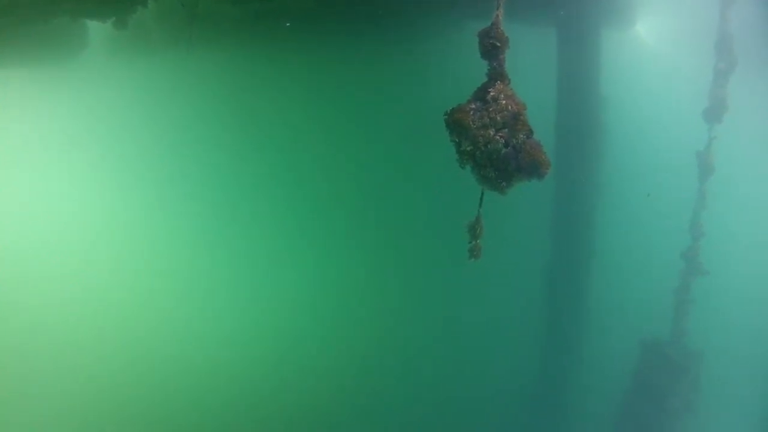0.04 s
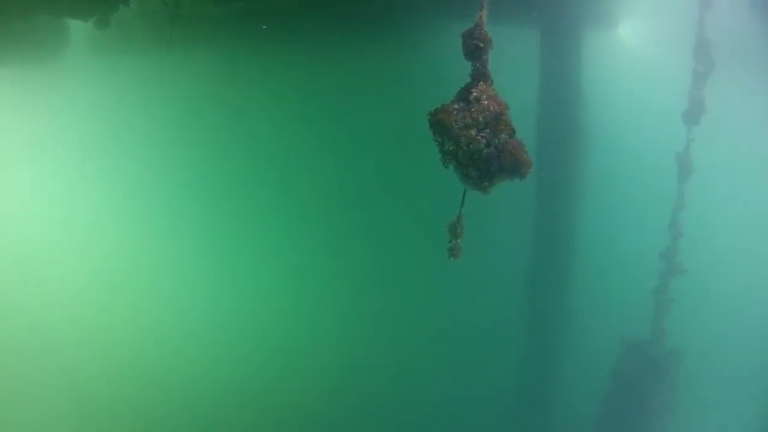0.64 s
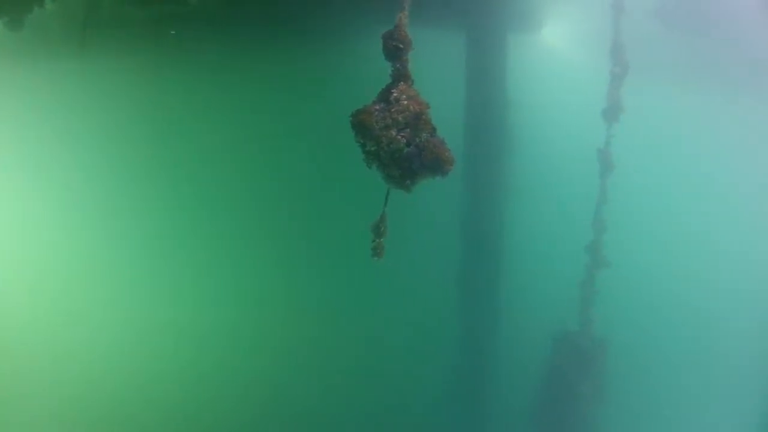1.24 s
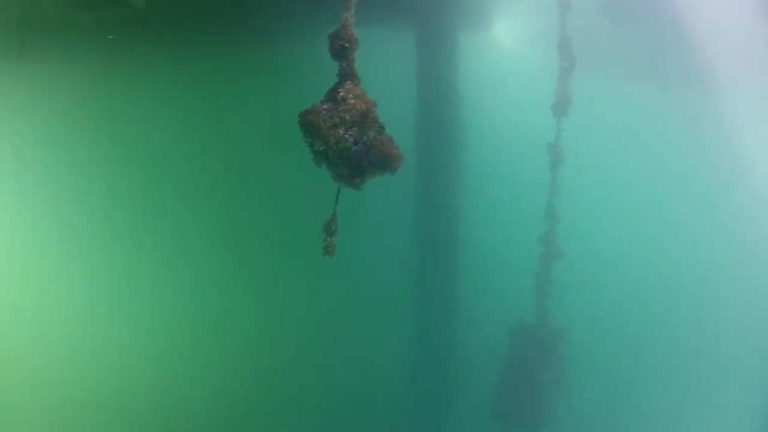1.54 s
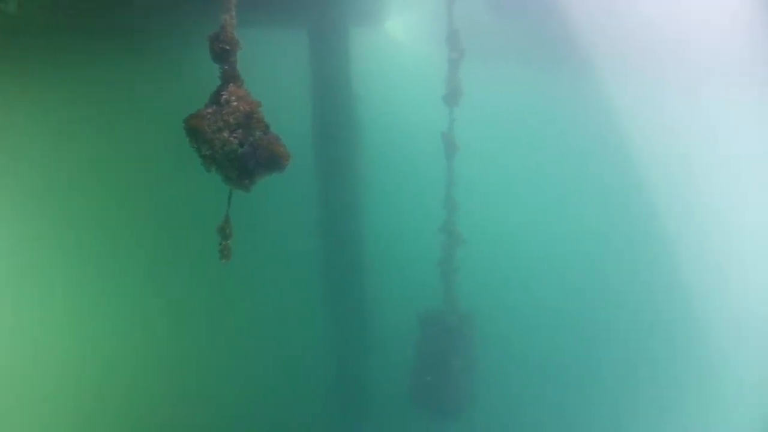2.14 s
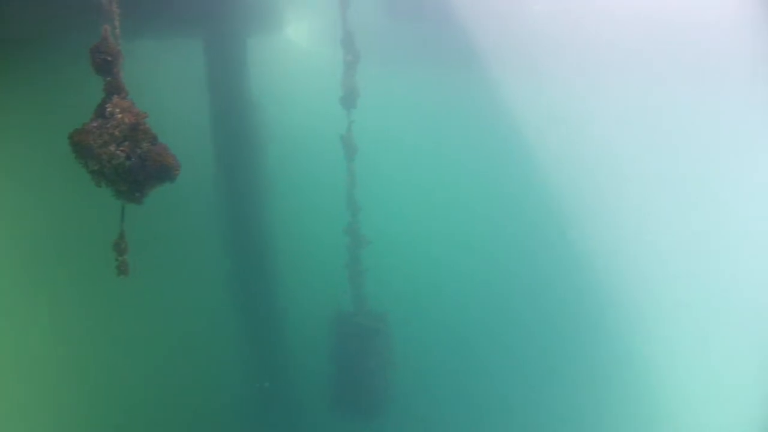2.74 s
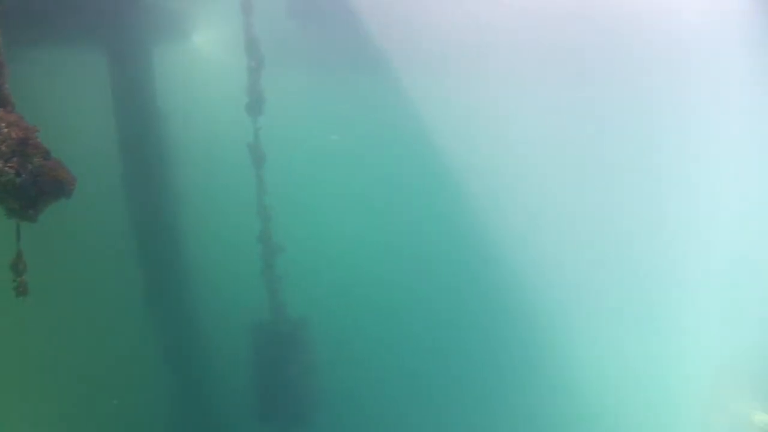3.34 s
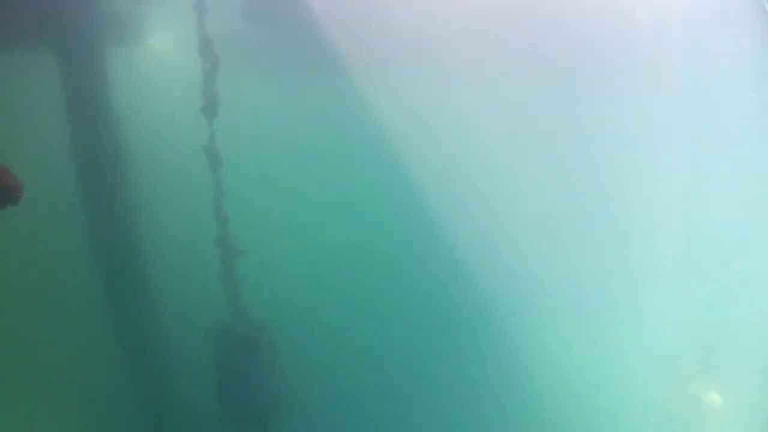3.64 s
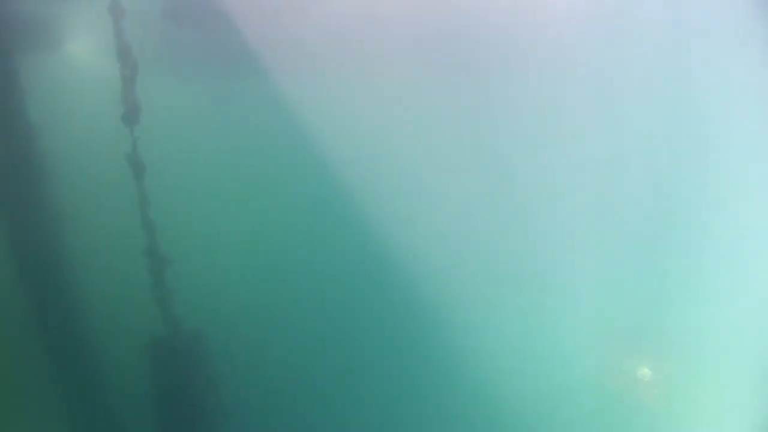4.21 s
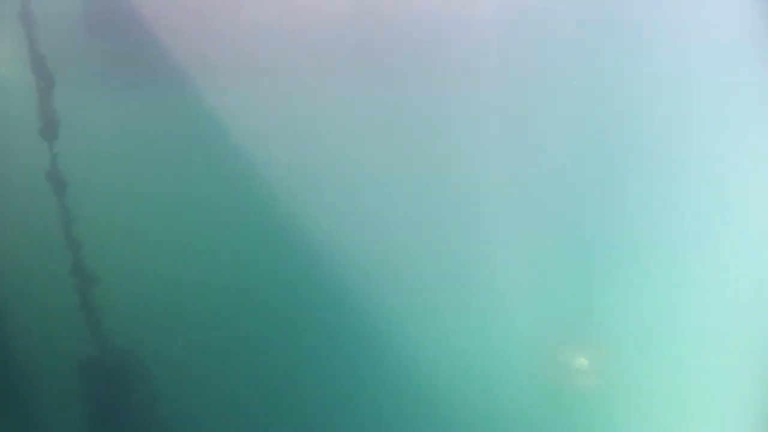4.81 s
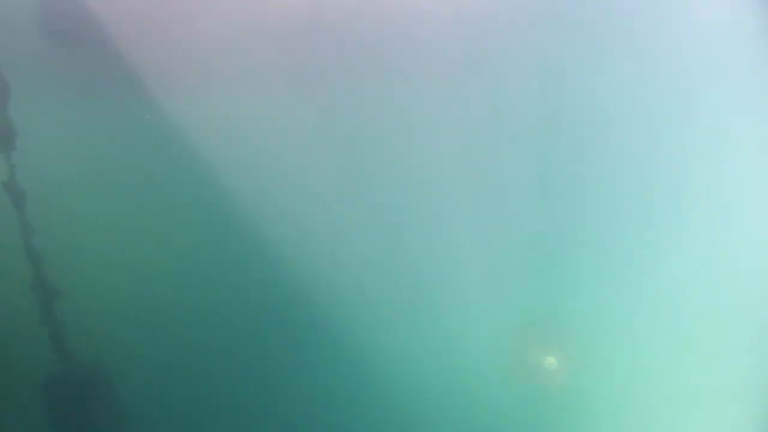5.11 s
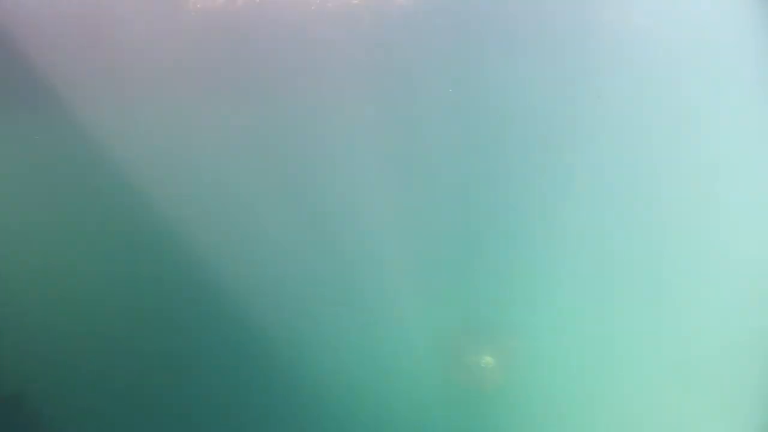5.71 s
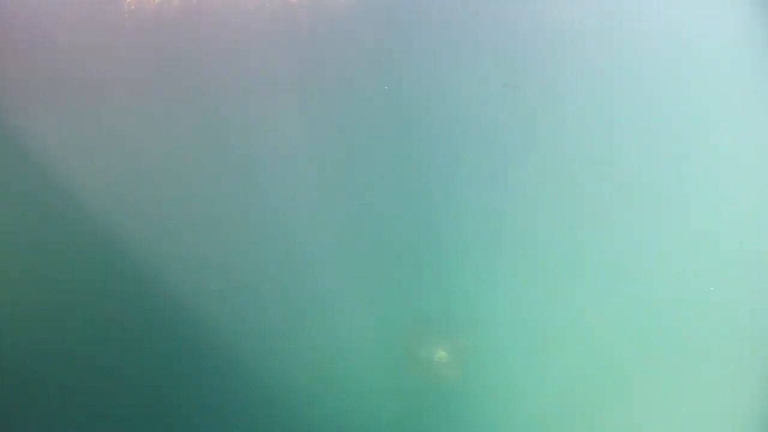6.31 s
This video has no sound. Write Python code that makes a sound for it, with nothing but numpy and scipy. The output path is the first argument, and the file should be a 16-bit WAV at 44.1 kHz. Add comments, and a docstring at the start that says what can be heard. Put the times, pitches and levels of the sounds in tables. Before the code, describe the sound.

Under a dock, a small diving robot's electric thrusters start with a clunk and settle into a low, wavering hum and churn with a thin whine. Snapping shrimp crackle all around, a few sharp, close snaps ringing the housing, over a faint wash of water. Near the end the motors brake with another clunk and the hum sinks away. The microphone is inside the robot.

```python
"""A small diving robot's thrusters start with a clunk, hum and churn under a dock, then brake and stop.
The shafts shake the robot's frame. Snapping shrimp crackle on the pilings all around and ring its
housing, over a low wash of water and two faint fizzes. The robot's microphone is sampled slowly and
each sample is held, which mirrors the hum into a thin whine."""
import sys
import numpy as np
from scipy import signal
from scipy.fft import rfft, irfft
from scipy.io import wavfile

SR = 44100
rng = np.random.default_rng(int(sys.argv[2]) if len(sys.argv) > 2 else 0)


def store_pcm(level_fs):
    """Save levels as 16-bit WAV."""
    pcm = np.round(np.clip(level_fs, -1, 1) * 32767).astype(np.int16)
    wavfile.write(sys.argv[1], SR, np.atleast_2d(pcm).T)


N = 289296
TIME = np.arange(N) / SR
FREQ = np.fft.rfftfreq(N, 1 / SR)

# Modes of frame and housing. Each row: frequency in Hz, width in Hz, relative level in dB.
FRAME_MODES = [(39.3, 60, -11.5), (81, 11, -14), (115.6, 32, 1), (123.3, 11.8, 5), (141.8, 20, -1.5),
               (183.7, 21, -11), (207.2, 36.4, -6), (260.3, 27, -8.5), (269.6, 47, -12), (314, 31, -26),
               (484.5, 67, -16), (549, 28, -18), (584.7, 30, -15.5), (651, 34, -19), (735, 57, -22)]
# Waves of shrimp activity. Each row: time in seconds, level in dB before trim.
COLONY_ACTIVITY = [(0.0, -69), (1.22, -68.5), (1.39, -65), (1.73, -71), (2.15, -67), (2.28, -69),
                   (3.31, -69.5), (3.54, -64.5), (3.73, -66.5), (3.98, -67), (4.97, -70.5), (5.81, -66.5),
                   (6.36, -72.5), (6.56, -65.5)]


def amp(db):
    return 10 ** (np.asarray(db) / 20)


def unit(x):
    """Scales to rms 1."""
    return x / np.sqrt(np.mean(x ** 2) + 1e-20)


def curve(rows):
    """Joins (seconds, value) rows by straight lines."""
    return np.interp(TIME, *np.transpose(rows))


def shape(points, f):
    """Gain of a (Hz, dB) spectrum, falling steeply past its ends."""
    hz, db = np.transpose(points)
    gain = amp(np.interp(np.log(f + 1), np.log(hz), db))
    return gain / (1 + (f / hz[-1]) ** 20) / (1 + (hz[0] / (f + 1) / 2) ** 4)


def colour(x, gain):
    """Filters x by a gain per frequency."""
    return irfft(rfft(x) * gain, N)


def drift(rate_hz):
    """Slow noise, rms 1."""
    return unit(colour(rng.standard_normal(N), np.exp(-(FREQ / rate_hz) ** 2)))


def click(points, size=1024):
    """Minimum-phase click with a (Hz, dB) spectrum, peak 1."""
    log_gain = np.log(shape(points, abs(np.fft.fftfreq(size, 1 / SR))) + 1e-4)
    wave = np.fft.ifft(np.exp(np.conj(signal.hilbert(log_gain)))).real
    return wave / abs(wave).max()


def add(mix, start_s, sound):
    part = mix[max(round(start_s * SR), 0):][:len(sound)]
    part += sound[:len(part)]


def water(level_db=-59.5):
    """Low wash of still harbour water."""
    # Each row: frequency in Hz, relative level in dB.
    spectrum = [(30, 3), (95, -1), (170, -3.5), (280, -8.5), (380, -10.5), (600, -9), (950, -20.5),
                (2300, -24.5), (3800, -25)]
    return amp(level_db) * unit(colour(rng.standard_normal(N), shape(spectrum, FREQ)))


def far_shrimp(groups=5, group_snaps_per_s=70, spread_db=5.5, detune=0.081, trim_db=-0.86):
    """Groups of faint snaps of uneven size, each group at its own pitch."""
    # A far snap through the housing. Each row: frequency in Hz, relative level in dB.
    spectrum = [(700, -11), (1000, -19.5), (1200, 1), (1600, -15.5), (1900, 5.5), (2300, 2.5), (2800, -6.5),
                (3400, -7), (3900, -26)]
    out = np.zeros(N)
    for scale in np.linspace(1 - detune, 1 + detune, groups):
        sizes = amp(spread_db * np.minimum(rng.exponential(1, N), 3))
        fires = rng.random(N) < group_snaps_per_s / SR
        impulses = sizes * fires * rng.choice([-1, 1], N)
        out += signal.oaconvolve(impulses, click([(hz * scale, db) for hz, db in spectrum]))[:N]
    return amp(curve(COLONY_ACTIVITY) + trim_db) * unit(out)


def harbour_echoes(x, near_db=-6, near_t60_s=0.021, far_db=-4, far_t60_s=0.25):
    """Snaps scatter off robot and pilings, then linger between surface and bottom."""
    t = np.arange(SR // 2) / SR
    decays = amp(-60 * t / np.array([[near_t60_s], [far_t60_s]]))
    taps = rng.standard_normal((2, len(t))) * decays * (t > .002)
    near, far = taps / np.linalg.norm(taps, axis=1, keepdims=True)
    return signal.fftconvolve(x, amp(near_db) * near + amp(far_db) * far)[:N]


def snap(level_db, ring_hz, crack_db, lift_db=11, swell_s=0.0011, glide=0.055):
    """Returns one snap's bare crack and the ring it raises in the housing."""
    # The crack. Each row: frequency in Hz, relative level in dB.
    spectrum = [(150, -22.5), (500, 3.5), (850, -4), (1180, 3), (1650, 1.5), (2300, 5.5), (2900, 3),
                (3500, -1), (3950, -7)]
    age = np.arange(1024) / SR / swell_s
    pitch_hz = ring_hz * (1 + glide * (1 - np.minimum(age, 4)))  # sags as the ring dies away
    ring = age ** 2 * np.exp(2 - 2 * age) * np.sin(2 * np.pi * np.cumsum(pitch_hz) / SR)
    crack_share = min(amp(lift_db + crack_db), .8)
    return amp(level_db) * 2 * crack_share * click(spectrum), amp(level_db) * (1 - crack_share) * ring


def stray_snaps(per_s=7, over_colony_db=16.5, range_db=6, ring_hz=2256, detune=0.094, crack_db=-18):
    """Random snap rows for shrimp a little farther off, louder when the colony is busy."""
    when, size, tone = rng.uniform(-1, 1, (int(per_s * N / SR), 3)).T
    starts_s = (when + 1) / 2 * N / SR
    levels_db = np.interp(starts_s, *np.transpose(COLONY_ACTIVITY)) + over_colony_db + range_db * size
    return [(s, db, hz, crack_db) for s, db, hz in zip(starts_s, levels_db, ring_hz * (1 + detune * tone))]


def near_shrimp(trim_db=2.5, bounce=0.82, far_db=-40, dryness=0.44, crack_scatter_db=-6):
    """Returns the direct snaps with their surface bounce, and the part that scatters."""
    # Each row: start in seconds, level in dB before trim, ring in Hz, crack share in dB before lift.
    closest = [(0.186, -34.5, 2290, -20), (0.3935, -45.5, 2320, -19), (0.5496, -43, 2420, -20.5),
               (0.592, -28, 2360, -20.5), (0.9577, -43.5, 2200, -19), (1.0288, -47.5, 2310, -12),
               (1.278, -44.5, 2170, -16.5), (1.428, -43, 2190, -20.5), (1.4826, -45, 2260, -16.5),
               (1.6511, -45, 2230, -11.5), (1.862, -39, 2080, -16), (1.9651, -36.5, 2450, -15.5),
               (2.0275, -44.5, 2200, -15.5), (2.2255, -43.5, 2180, -21), (2.273, -39.5, 2250, -22),
               (2.576, -44.5, 2000, -17.5), (2.8292, -27.5, 2180, -13.5), (2.936, -42, 2000, -17.5),
               (3.2152, -47.5, 2120, -16), (3.4078, -43.5, 2259, -17.5), (3.4915, -23.5, 1970, -17.5),
               (3.7316, -39, 2080, -20), (3.7907, -41, 2020, -16), (3.871, -31.5, 2020, -22.5),
               (4.2024, -33.5, 2050, -19), (4.326, -15, 2031, -21), (4.3916, -38.5, 2270, -18.5),
               (4.7977, -45.5, 2000, -19), (5.208, -35.5, 1910, -12.5), (5.301, -50, 2736, -26),
               (5.345, -46.5, 2380, -13), (5.6213, -29.5, 2410, -12), (5.696, -45.5, 2056, -20),
               (5.7474, -39.5, 2140, -21), (6.1378, -47.5, 2040, -22), (6.4507, -38, 2100, -18.5),
               (6.4963, -47, 2220, -25)]
    direct, scattered = np.zeros(N), np.zeros(N)
    lags_s = rng.uniform(0.00199, 0.0041, size=200)
    for (start_s, level_db, ring_hz, crack_db), lag_s in zip(closest + stray_snaps(), lags_s):
        crack, ring = snap(level_db + trim_db, ring_hz, crack_db)
        echo = amp(-dryness * max(level_db - far_db, 0))  # louder is closer, so drier
        add(direct, start_s, crack + ring)
        add(direct, start_s + lag_s, bounce * echo * (crack + ring))
        add(scattered, start_s, echo * (amp(crack_scatter_db) * crack + ring))
    return direct, scattered


def jolts(split_hz=380, thump_rise_s=0.054, clang_rise_s=0.0017, tilt=1.2, housing=0.4, top_hz=830):
    """Starting and braking kick the frame: low modes thump, a motor pod clangs with the high ones."""
    # Each row: start in seconds, thump level in dB, thump T60 in seconds,
    # clang level in dB, clang pitch in Hz, clang T60 in seconds.
    kicks = [(0.21, -50, 0.04, -37, 610, 0.023), (0.3033, -23, 0.14, -28.5, 616, 0.11),
             (0.351, -28.5, 0.075, -27, 576, 0.058), (6.047, -18.5, 0.065, -25.5, 510, 0.083),
             (6.057, -21.5, 0.086, -24.5, 626, 0.11), (6.2855, -74, 0.041, -42.5, 610, 0.032),
             (6.3346, -54, .05, -44, 606, 0.034)]
    out, t = np.zeros(N), np.arange(SR // 3) / SR
    modes = [(hz, amp(db) * hz ** tilt * np.sin(2 * np.pi * hz * t)) for hz, _, db in FRAME_MODES]
    low = sum(wave for hz, wave in modes if hz < split_hz)
    high = sum(wave for hz, wave in modes if hz > split_hz)
    for start_s, thump_db, thump_t60_s, clang_db, clang_hz, clang_t60_s in kicks:
        thump = low * amp(-60 * t / thump_t60_s) * (1 - np.exp(-t / thump_rise_s))
        clang = np.sin(2 * np.pi * clang_hz * t) + housing * unit(high)
        clang *= amp(-60 * t / clang_t60_s) * (1 - np.exp(-t / clang_rise_s))
        add(out, start_s, amp(thump_db) * thump / abs(thump).max())
        add(out, start_s, amp(clang_db) * clang / abs(clang).max())
    return signal.sosfilt(signal.butter(6, top_hz, fs=SR, output="sos"), out)  # the kicks stay dull, with no treble


def thrusters(start_s=.305, rise_s=.004, drive_db=-43.5, surge_db=.4, flutter_db=4.5,
              hum_vs_churn_db=-3, whine_vs_churn_db=-18):
    """Wavering shaft hum and motor whine; churning water shakes the frame twice a turn."""
    # Each row: time in seconds, shaft speed in turns per second up to the brake.
    shaft = [(.3, 36.5), (1.5, 35.5), (3, 35.3), (5, 35.4), (6.05, 35.3)]
    # Shaft hum. Each row: multiple of shaft speed, relative level in dB.
    orders = [(1, -18.5), (2, -4.5), (3, -0.5), (4, -9.5), (6, -7)]
    # Motor whine. Each row: frequency in Hz, relative level in dB.
    motor_tones = [(489, -1.5), (568, 1.5), (643, 0)]
    # After the brake the hum dips in pitch, swings back up, then sinks and fades.
    # Each row: time in seconds, gain in dB, pitch factor. The first row holds until the brake.
    tail = [(6.047, 6, 1), (6.098, -0.5, 0.65), (6.171, 1.5, 1.1), (6.23, -8, 1), (6.289, -15, .9),
            (6.42, -15, .7), (6.55, -23, .6)]
    tail_s, tail_db, tail_pitch = np.transpose(tail)
    hum_hz = curve(shaft) * np.interp(TIME, tail_s, tail_pitch)
    turns = np.cumsum(hum_hz * (1 + 0.0068 * drift(16.6))) / SR
    hum, whine = np.zeros(N), np.zeros(N)
    for order, db in orders:
        hum += amp(db + flutter_db * drift(7.1)) * np.sin(2 * np.pi * (order * turns + rng.random()))
    for hz, db in motor_tones:
        gain = amp(db + flutter_db * drift(9.5))
        pitch_hz = hz * (1 + 0.0059 * drift(12.5))
        whine += gain * np.sin(2 * np.pi * np.cumsum(pitch_hz) / SR)
    frame_power = sum(amp(db) ** 2 / (1 + 2 * ((FREQ - hz) / width_hz) ** 2) ** 2
                      for hz, width_hz, db in FRAME_MODES)
    pulsing = (1 + 0.18 * np.cos(2 * np.pi * 2 * turns)) ** 2
    churn = colour(rng.standard_normal(N) * pulsing, np.sqrt(frame_power))
    onset = np.clip((TIME - start_s) / rise_s, 0, 1)
    level_db = drive_db + surge_db * drift(3.7) + np.interp(TIME, tail_s, tail_db)
    mix = amp(hum_vs_churn_db) * unit(hum) + amp(whine_vs_churn_db) * unit(whine) + unit(churn)
    return onset * amp(level_db) * unit(mix)


def fizzes(grain_chance=.02):
    """Short raspy puffs of fine grains."""
    # Each row: start in seconds, length in seconds, level in dB.
    puffs = [(0.854, 0.057, -64.5), (5.475, 0.051, -70)]
    # One grain. Each row: frequency in Hz, relative level in dB.
    spectrum = [(900, -7), (1500, 7), (2500, -4), (3300, 4), (3900, -21)]
    out = np.zeros(N)
    for start_s, length_s, db in puffs:
        n = round(length_s * SR)
        grains = rng.standard_normal(n) * (rng.random(n) < grain_chance)
        puff = signal.oaconvolve(grains * signal.windows.tukey(n, .5), click(spectrum))
        add(out, start_s, amp(db) * unit(puff))
    return out


def scene():
    """Motors, shrimp and water reach one microphone inside the robot."""
    robot = thrusters() + jolts()
    colony = far_shrimp()
    wash = fizzes() + water()
    snaps, scattered = near_shrimp()
    return (robot + snaps + colony + harbour_echoes(scattered + colony) + wash)[None]


def record(dry, clock_hz=8000, low_hz=26, guard_hz=3850, edge_hz=15300):
    """Sample-and-hold mirrors the sound around each clock multiple; then treble lift and band limit."""
    count = round(clock_hz * N / SR)
    band = rfft(dry[0]) / np.sqrt(1 + (FREQ / guard_hz) ** 40 + (low_hz / (FREQ + 1)) ** 6)
    samples = irfft(band[:count // 2 + 1], count)
    mirrored = np.fft.fft(samples)[np.arange(len(FREQ)) % count]
    held = mirrored * np.sinc(FREQ / clock_hz)
    treble = amp(np.interp(FREQ, [7400, 11300, 14100, 15100], [0, 2, 2, -2]))
    return irfft(held * treble / np.sqrt(1 + (FREQ / edge_hz) ** 240), N)[None]


dry = scene()
out = record(dry)
store_pcm(out)
```